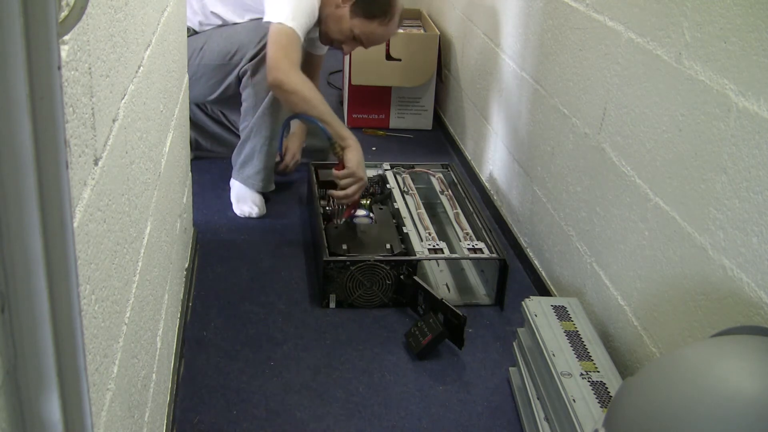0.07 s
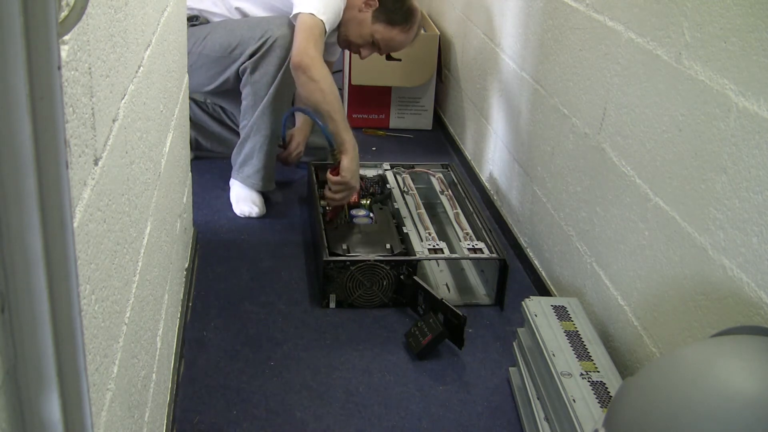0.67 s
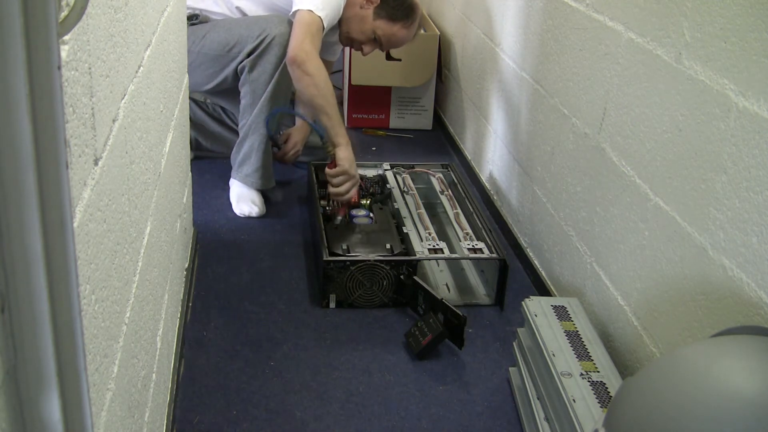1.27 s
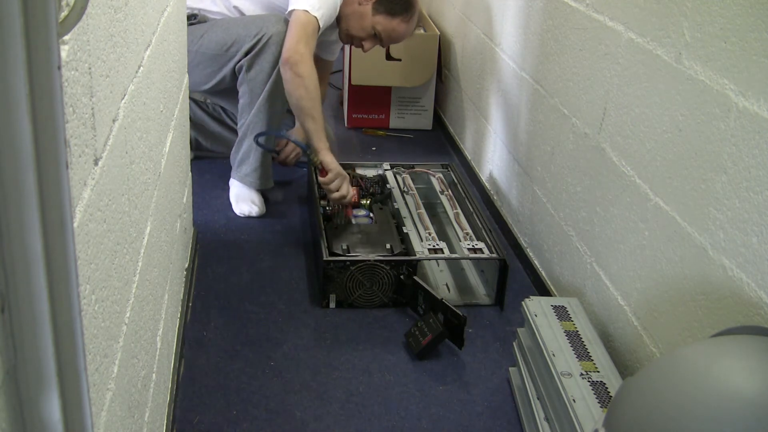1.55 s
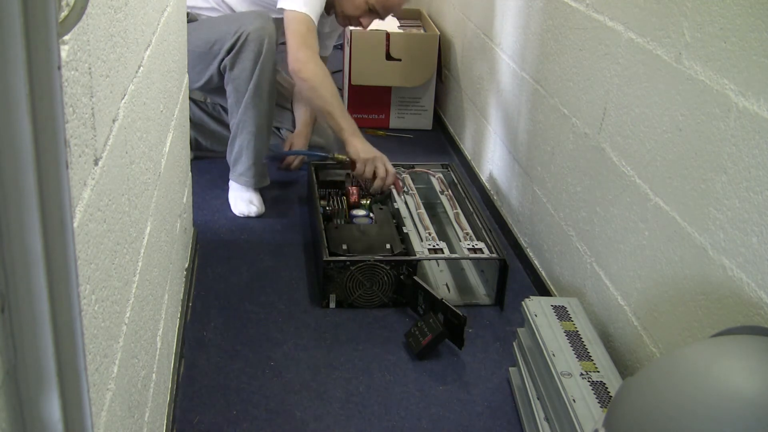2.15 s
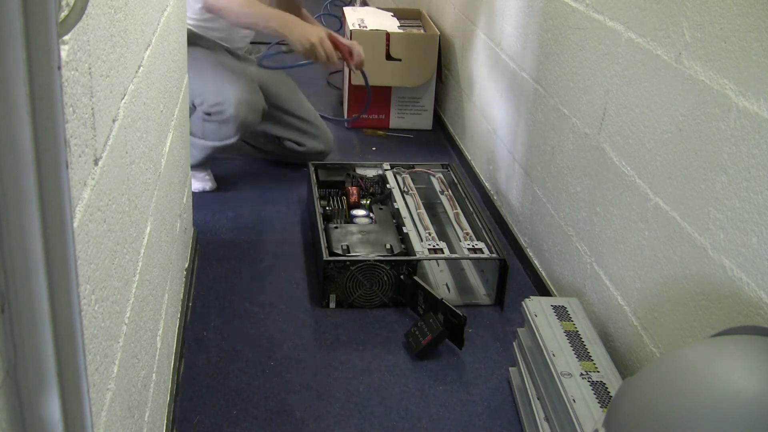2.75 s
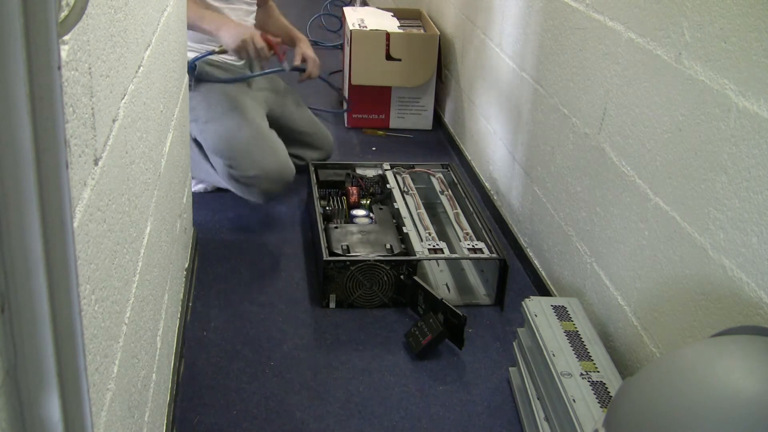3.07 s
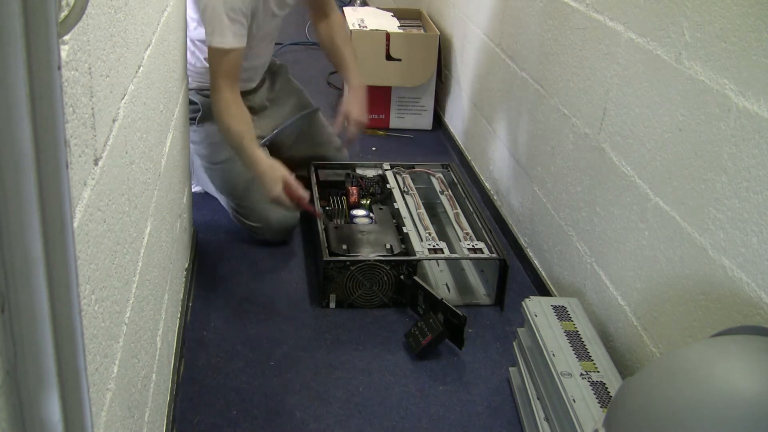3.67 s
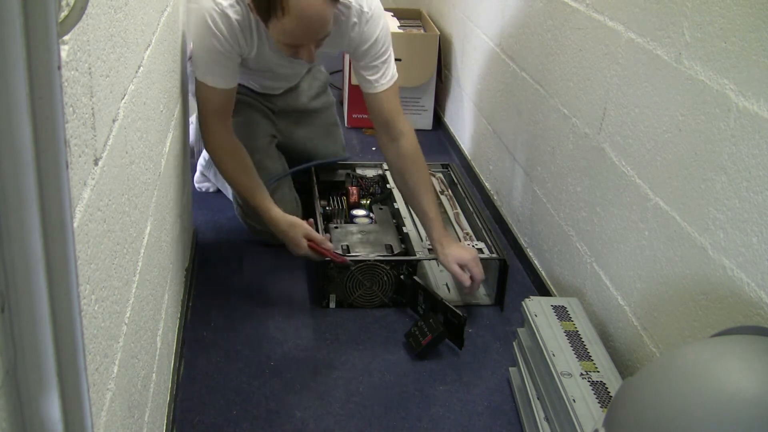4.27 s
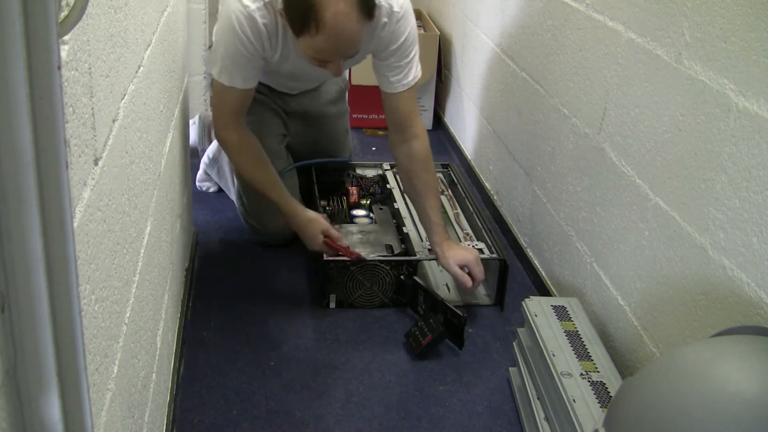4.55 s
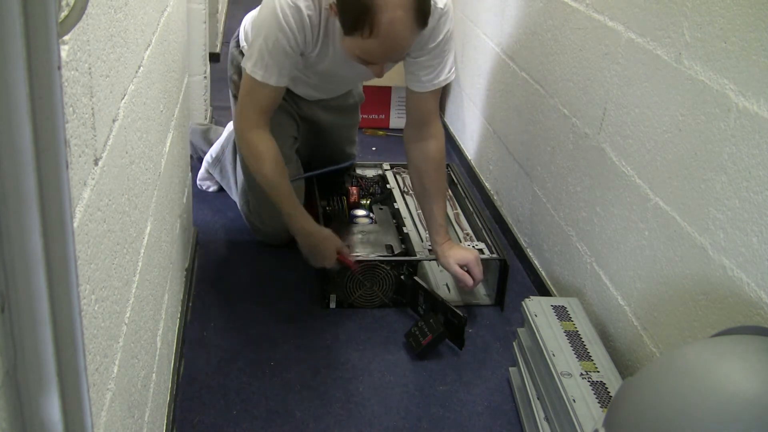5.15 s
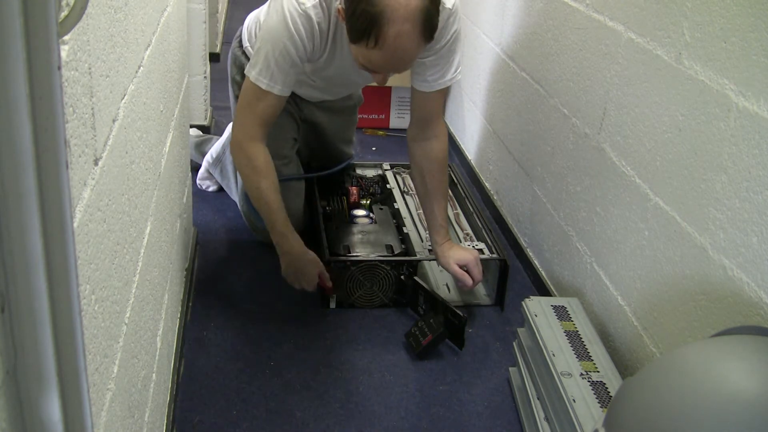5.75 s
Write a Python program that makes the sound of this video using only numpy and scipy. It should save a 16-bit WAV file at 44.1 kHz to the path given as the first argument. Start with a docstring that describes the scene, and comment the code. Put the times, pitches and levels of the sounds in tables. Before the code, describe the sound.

A compressed air gun hisses in three blasts, blowing out a metal computer case, with light knocks and clicks in a pause.

```python
"""A narrow block-walled corridor, where a compressed air gun blows dust from an open computer case.
In three blasts the turbulent jet radiates a broadband hiss; sweeping over the case it tears on edges
and excites the resonances of gaps, cavities and the steel rim. In the long pause the gun clicks and
leaks, and two knocks set the panels into damped vibration. Thuds like distant steps excite the low
modes of floor and corridor, over steady ventilation noise and a weak mains hum."""
import sys
import numpy as np
from scipy import signal
from scipy.fft import rfft, irfft, next_fast_len
from scipy.io import wavfile
from scipy.ndimage import map_coordinates

SR = 44100
rng = np.random.default_rng(int(sys.argv[2]) if len(sys.argv) > 2 else 0)


def wrap_up_sound(samples):
    """Save the sound to the file named by the first command line argument, as 16-bit audio."""
    columns = np.atleast_2d(samples).T
    # keep every value between -1 and 1, then stretch to whole-number steps
    tamed = np.clip(columns, -1, 1)
    steps = np.round(tamed * 32767).astype(np.int16)
    wavfile.write(sys.argv[1], SR, steps)


N = 260631
TIME = np.arange(N) / SR
EVENT_TIME = TIME[:SR // 2]  # t/s within one short event


def amp(db):
    """Amplitude ratio of a level in decibels."""
    return 10 ** (np.asarray(db) / 20)

def along(points, hz):
    """Interpolation of (f/Hz, value) points on a logarithmic frequency axis."""
    f, value = np.transpose(points)
    return np.interp(np.log(hz + 1), np.log(f + 1), value)

def hump(centre_hz, octaves):
    """Gaussian band-pass response on a logarithmic frequency axis."""
    return lambda hz: np.exp(-.5 * (np.log2((hz + 1) / centre_hz) / octaves) ** 2)

def resonance(pitch_hz, half_width_hz):
    """Resonance curve, falling to one half about half_width_hz from its peak."""
    return lambda hz: 1 / (1 + ((hz ** 2 - pitch_hz ** 2) / (2 * half_width_hz * (hz + 1))) ** 2)

def filtered(x, response):
    """Linear filtering: the spectrum is multiplied by a complex frequency response."""
    size = next_fast_len(x.shape[-1] + SR // 4, real=True)
    spectrum = rfft(x, size) * response(np.fft.rfftfreq(size, 1 / SR))
    return irfft(spectrum, size)[..., :x.shape[-1]]

def noise(response, size=N):
    """Two uncorrelated noises, spectrally shaped and normalised to rms 1."""
    pair = filtered(rng.standard_normal((2, size)), response)
    return pair / np.sqrt(np.mean(pair ** 2) + 1e-20)

def wobble(rate):
    """Smooth random modulation: a spline through rate knots a second."""
    return map_coordinates(rng.standard_normal(int(N * rate / SR) + 4), [TIME * rate])

def add(track, start, sound):
    """Superposition of a sound on the track, start seconds in."""
    part = track[..., max(round(start * SR), 0):][..., :sound.shape[-1]]
    part += sound[..., :part.shape[-1]]

def add_noise(track, start, envelope, response):
    """Amplitude modulation: one short event of shaped noise is added to the track."""
    add(track, start, envelope * noise(response, size=len(envelope)))


# Paths to the microphones: ([f/Hz, right minus left/dB], f/Hz above which they tend to antiphase)
FROM_INSIDE_CASE = ([(1000, -0.2), (2400, 2), (4500, 5.5), (8000, 8), (13000, 10)], 9300)
FROM_RIM = ([(1000, 2), (2400, 5.6), (4200, 11.2), (8000, 13), (15000, 12)], 3800)
FROM_AROUND = ([(400, -1), (1000, 1), (4000, 4.5), (8000, 5), (15000, 2.5)], 6600)
# Coherence of the two microphones: f/Hz, coherence (0-1)
COHERENCE = [(300, 1), (1000, 0.94), (2000, 0.86), (4000, 0.44), (8000, 0.7), (14000, 0.6)]

def placed(pair, path, shadow_hz=600):
    """Partial coherence at two microphones; below shadow_hz diffraction evens out their levels."""
    balance, antiphase_hz = path
    def response(hz):
        coherence = along(COHERENCE, hz)
        right = amp(along(balance, hz) * hz ** 2 / (hz ** 2 + shadow_hz ** 2))
        phase_lead = np.pi * (1 - np.exp(-hz / antiphase_hz))
        shared = right * coherence * np.exp(1j * phase_lead)
        own = right * np.sqrt(1 - coherence ** 2)
        mid_gain = np.sqrt(abs(1 + shared) ** 2 + own ** 2) / 2
        return np.array([np.ones_like(hz), shared, own]) / mid_gain
    left, shared, own = filtered(pair[[0, 0, 1]], response)
    return np.array([left, shared + own])


# Ventilation spectrum: f/Hz, relative level/dB
VENT_SPECTRUM = [(15, -25), (25, -11), (102, -6.5), (157, -7), (185, -1), (217, -5), (416, -2), (516, -3),
                 (560, -8.5), (911, -8), (1290, -12.5), (1400, -13), (2350, -20.5), (4490, -24.5),
                 (16000, -34)]
# Its faint hissing bands: f/Hz, half-width/Hz, level/dB
VENT_BANDS = [(4740, 280, -77), (6700, 600, -75)]

def ventilation_and_hum(air_db=-53.5, hum_db=-68.5, hum_hz=100):
    """Stationary background: broadband ventilation noise plus a pure tone of mains hum."""
    air = amp(air_db) * noise(lambda hz: amp(along(VENT_SPECTRUM, hz)))
    air += sum(amp(db) * noise(resonance(hz, width)) for hz, width, db in VENT_BANDS)
    return placed(air, FROM_AROUND) + amp(hum_db) * np.sin(2 * np.pi * hum_hz * TIME)


# Spectra of the free jet and of air on edges, in slots and in the cavity: f/Hz, relative level/dB
JET_SPECTRUM = [(4400, -23), (7500, 6.5), (8300, 6), (10100, 2), (12500, 8), (14500, 7.5), (16000, -3)]
EDGE_SPECTRUM = [(1410, -28.5), (2400, -10.5), (2870, 0.5), (4290, 4.5), (6540, 5), (8200, -10),
                 (10700, -2.5), (18000, -120)]
SLOT_SPECTRUM = [(500, -34), (850, -6.5), (1070, -3.5), (1130, -2.5), (1400, -2), (1590, -5.5), (1740, -4),
                 (2140, -4.5), (2600, -7), (3380, -6.5), (5720, -120)]
CAVITY_SPECTRUM = [(71, -87), (120, -64), (193, -14), (285, -12.5), (322, -20.5), (354, -6.5), (393, -6),
                   (459, 0.5), (518, -2.5), (575, -8.5), (643, -7), (799, -2.5), (950, -9.5), (1240, -15),
                   (2090, -120)]
# Trigger pulls: opening t/s, rise/s, release t/s, base level/dB on edges, in slots and in the cavity,
# nozzle position (0 inside, 1 at the near rim)
TRIGGER_PULLS = [(-.05, .01, 0.11, -26, -33.5, -51, 0), (0.362, 0.024, 2.1376, -32, -36, -42.5, 0),
                 (4.329, .016, 6.0, -31, -38, -40.5, 1)]
# Strength of the free jet, one curve per blast: t/s, level/dB
JET_STRENGTH = [
    [(.04, -27), (.1, -34.5)],
    [(.445, -32), (.565, -35), (.62, -27), (1.2, -27), (1.32, -31), (1.6, -29), (1.8, -29), (1.85, -24.5),
     (2.08, -28), (2.13, -26.5)],
    [(4.45, -25.5), (4.505, -21.5), (4.78, -28), (4.87, -22), (4.97, -27), (5.14, -24), (5.3, -29),
     (5.42, -22.5), (5.48, -29.5), (5.59, -28), (5.65, -23), (5.69, -24), (5.745, -29.5), (5.82, -24.5)],
]
# Its impact on the case as the hand sweeps, one curve per blast: t/s, level/dB
JET_IMPACT = [
    [(.01, -37.5), (.13, -30.5)],
    [(.45, -38.5), (.58, -46), (.66, -38.5), (.95, -38), (1.05, -39.5), (1.23, -38.5), (1.3, -34),
     (1.58, -39.5), (1.74, -31), (1.88, -37), (1.96, -31), (2.09, -29.5)],
    [(4.4, -35), (4.57, -37), (4.81, -30), (4.88, -49), (4.96, -33.5), (5.19, -34.5), (5.27, -45),
     (5.34, -38), (5.46, -47), (5.52, -42), (5.66, -48), (5.8, -40), (5.9, -48.5)],
]
# Sensitivity of edges, slots and cavity: dB/dB of impact, of strength and of pressure loss, flutter/dB
SENSITIVITY = [(.4, 0.48, .7, 1), (.95, 0, .68, .9), (.95, 0, .72, 1.04)]

def air_gun(burst_db=9.5, burst_s=.054, bleed_db_per_s=255, ease_s=.031, shut_s=.244):
    """Turbulent noise follows the supply pressure; air striking the case also follows the impact."""
    out = np.zeros((2, N))
    gusts = flares() + roars() + whistles()
    spectra = JET_SPECTRUM, EDGE_SPECTRUM, SLOT_SPECTRUM, CAVITY_SPECTRUM
    jet, *case_noises = [noise(lambda hz: amp(along(shape, hz))) for shape in spectra]
    flutter = wobble(rate=64)
    base_strength_db, base_impact_db = -25.5, -36
    for pull, strength, impact in zip(TRIGGER_PULLS, JET_STRENGTH, JET_IMPACT):
        opens, rise, release, *levels_db, at_rim = pull
        # The pressure stored in the hose escapes first.
        burst = burst_db * np.exp(-(np.maximum(TIME - opens, 0) / burst_s) ** 2)
        # The trigger is eased off, then the pressure falls steadily.
        released = np.maximum(TIME - release, 0)
        loss_db = bleed_db_per_s * released * (1 - np.exp(-released / ease_s))
        jet_db = np.interp(TIME, *np.transpose(strength)) + burst
        impact_db = np.interp(TIME, *np.transpose(impact)) - base_impact_db
        air = jet * amp(jet_db - 1.23 - loss_db + .5 * flutter) + gusts * amp(-.75 * loss_db)
        for part, db, sensitivity in zip(case_noises, levels_db, SENSITIVITY):
            by_impact, by_strength, by_loss, flutter_db = sensitivity
            drive_db = by_impact * impact_db + by_strength * (jet_db - base_strength_db)
            air += part * amp(db + drive_db - by_loss * loss_db + flutter_db * flutter)
        valve_opening = np.clip((TIME - opens) / rise, 0, 1) ** 2
        valve_closing = np.clip((release + shut_s - TIME) / .02, 0, 1)
        air *= valve_opening * valve_closing
        out += placed(air + rim_ring(air), FROM_RIM) if at_rim else placed(air, FROM_INSIDE_CASE)
    return out

def moving_echoes(x, strength=.14, drift_s=.00013, count=7):
    """Comb filtering by reflections from case and walls, whose paths shift as the hand moves."""
    out = x.copy()
    for delay in rng.uniform(.001009, .013, count):
        emitted = TIME - delay - drift_s * wobble(rate=3)
        out += strength * np.array([np.interp(emitted, TIME, side, left=0) for side in x])
    return out / np.sqrt(1 + count * strength ** 2)

def sweep(length, skew=.7):
    """Envelope of a jet that moves quickly onto an opening and slides off within length seconds."""
    progress = np.minimum(EVENT_TIME / length, 1)
    return np.sqrt(np.abs(np.sin(np.pi * progress ** skew)))


# The jet over narrow gaps: t/s, relative level/dB, f/Hz, half-width/Hz, duration/s
GAP_WHISTLES = [(.06, -33.5, 2040, 130, 0.12), (.005, -28, 4950, 250, .09), (0.602, -37, 5500, 650, 0.48),
                (1.27, -32.5, 1170, 130, 0.39), (1.278, -30.5, 1410, 120, 0.27),
                (1.541, -34, 1250, 200, 0.12), (1.683, -25.5, 1290, 196, .035),
                (1.922, -27.5, 482, 70, .09), (2.008, -28.5, 1600, 250, 0.12), (4.37, -39, 497, 70, .47),
                (4.935, -41, 510, 70, .33), (4.423, -32.5, 2860, 45, .024), (4.422, -31, 6779, 50, 0.026),
                (4.634, -31, 2800, 70, 0.022), (4.72, -30, 6400, 350, 0.031), (4.828, -27, 8000, 330, 0.14),
                (4.945, -28.5, 6460, 400, 0.21), (5.168, -33, 8040, 250, 0.073),
                (5.306, -36, 1290, 130, .1), (5.294, -37.5, 895, 140, .13), (5.765, -34, 1220, 160, .07)]

def whistles():
    """Resonance: a narrow gap selects one band of the turbulence and sounds a rough tone."""
    out = np.zeros((2, N))
    for start, db, pitch_hz, width_hz, length in GAP_WHISTLES:
        add_noise(out, start, amp(db - 2.3) * sweep(length), resonance(pitch_hz, width_hz))
    return out


# Flares on edges and, at 1.47 s, a brief low rumble of the case's panels under the jet:
# t/s, relative level/dB, centre f/Hz, spread/octaves, nominal duration/s
JET_FLARES = [(.012, -26.5, 4300, 0.84, .06), (1.268, -20.5, 3660, 0.87, 0.039),
              (1.36, -26, 3480, 0.47, 0.074), (1.47, -51, 172, .3, .16), (1.626, -19.5, 10000, 1.1, 0.047),
              (1.711, -17.5, 5300, 0.41, 0.02), (1.731, -22.5, 4500, .6, 0.073),
              (1.814, -20.5, 11500, 0.54, 0.03), (2.1, -27, 2900, 0.36, 0.026),
              (4.352, -26.5, 795, 0.33, 0.016), (4.419, -20.5, 2270, 2.1, 0.012),
              (4.641, -18.5, 3640, 1.9, 0.025), (4.733, -21, 4870, 0.98, 0.02),
              (4.825, -17.5, 12500, 0.99, 0.023), (4.862, -21, 6560, 0.62, 0.027),
              (5.125, -21, 4130, 0.99, 0.023), (5.169, -17.5, 4850, 1.1, 0.011),
              (5.206, -23.5, 5500, 1.2, 0.021), (5.332, -26.5, 6170, 0.25, 0.033),
              (5.49, -27, 880, 0.92, 0.011), (5.6, -27.5, 5400, 0.17, 0.077),
              (5.858, -27.5, 5460, 0.21, 0.082)]

def flares():
    """Flow excitation: a noise band swells and decays as the jet crosses an edge or shakes panels."""
    out = np.zeros((2, N))
    for start, db, centre_hz, octaves, length in JET_FLARES:
        age = 2 * EVENT_TIME / length
        swell = age * np.exp(1 - age)
        add_noise(out, start, amp(db - 3) * swell, hump(centre_hz, octaves))
    return out


# The jet over openings: t/s, relative level/dB, duration/s, opening (0 cavity, 1 slots)
OPENING_ROARS = [(.015, -36.5, 0.041, 0), (1.272, -29, .25, 1), (1.492, -34.5, 0.082, 0),
                 (1.682, -30.5, .055, 0), (1.743, -30, 0.025, 0), (1.784, -32, 0.031, 1),
                 (1.912, -32.5, .2, 0), (4.346, -37.5, 0.043, 0), (5.49, -36, .1, 0)]

def roars():
    """Cavity resonance: the hollow case or its slots colour the noise of the passing jet."""
    out = np.zeros((2, N))
    for start, db, length, in_slots in OPENING_ROARS:
        shape = SLOT_SPECTRUM if in_slots else CAVITY_SPECTRUM
        add_noise(out, start, amp(db - 1.5) * sweep(length), lambda hz: amp(along(shape, hz)))
    return out


# Notches in the hiss: centre t/s, half-duration/s, f/Hz, half-width/Hz, depth (0-1)
ECHO_NOTCHES = [(0.65, .26, 4220, 324, .66), (1.047, .084, 4180, 330, .62)]

def bottom_echo(x):
    """Destructive interference: the echo off the case's bottom cancels a band as the nozzle hovers."""
    for centre, half_length, notch_hz, width_hz, depth in ECHO_NOTCHES:
        hovering = np.exp(-((TIME - centre) / half_length) ** 2)
        x = x - depth * hovering * filtered(x, resonance(notch_hz, width_hz))
    return x


# Clicks of the gun and its hose: t/s, level/dB, centre f/Hz, T60/s
GUN_CLICKS = [(2.261, -45, 10850, 0.16), (3.29, -58, 3960, .15), (3.401, -60, 4440, 0.18),
              (4.272, -33.5, 11100, 0.018), (4.281, -48, 9000, 0.14)]

def clicks():
    """Impulsive excitation: each light contact gives a bright noise that decays exponentially."""
    out = np.zeros((2, N))
    for start, db, centre_hz, t60 in GUN_CLICKS:
        add_noise(out, start, amp(db - 60 * EVENT_TIME / t60), hump(centre_hz, octaves=1.07))
    return out


# Reverberation time of the corridor: f/Hz, T60/s
CORRIDOR_DECAY = [(200, 0.31), (2000, 0.32), (12000, 0.15)]

def corridor(x):
    """Reverberation: the wall reflections form a diffuse tail whose treble decays first."""
    hz, t, spectrum = signal.stft(rng.standard_normal((2, SR // 2)), SR, nperseg=256)
    decay = amp(-60 * t / along(CORRIDOR_DECAY, hz)[:, None])
    tail = signal.istft(spectrum * decay, SR, nperseg=256)[1]
    return signal.fftconvolve(x, tail / np.linalg.norm(tail[0]), axes=1)[:, :N]

def leak(start=2.4, end=2.62, breath_db=-52, hiss_db=-57):
    """Weak jet noise: air escapes as the gun is lifted out, brightening as the flow grows."""
    flow = np.clip((TIME - start) / .14, 0, 1) ** .5 * np.clip((end - TIME) / .016, 0, 1)
    breath = amp(breath_db) * noise(hump(1300, octaves=1))
    hiss = amp(hiss_db) * noise(hump(5900, octaves=.72))
    return flow * breath + flow ** 2 * hiss


# Response of the case's panels: f/Hz, relative level/dB
PANEL_SPECTRUM = [(120, -55), (200, -49), (272, -25), (411, -0.5), (513, -4.5), (569, 3), (641, -3),
                  (984, -6), (1050, -10.5), (1270, -2.5), (1510, -9.5), (2400, -16), (6700, -39.5),
                  (9120, -39), (12000, -44), (15600, -72), (22000, -120)]
# Knocks on the case: t/s, level/dB, tilt/(dB per octave), T60/s, contact cut-off f/Hz
CASE_KNOCKS = [(2.569, -24, -5, 0.067, 5000), (2.583, -32, -8, 0.079, 5000), (3.955, -32, 5, 0.084, 4800)]

def knocks(rise_s=.00083):
    """Damped vibration of struck panels; the softness of the contact limits the treble."""
    out = np.zeros((2, N))
    for start, db, tilt, t60, cutoff_hz in CASE_KNOCKS:
        def panel(hz):
            tilt_db = tilt * np.log2(np.maximum(hz, 400) / 1000)
            return amp(along(PANEL_SPECTRUM, hz) + tilt_db) / (1 + (hz / cutoff_hz) ** 2)
        attack = 1 - np.exp(-EVENT_TIME / rise_s)
        add_noise(out, start, attack * amp(db - 60 * EVENT_TIME / t60), panel)
    return out


# Thuds through the floor: t/s, relative level/dB
FOOTFALLS = [(3.31, -37.5), (4.001, -41), (4.645, -43), (5.225, -43), (5.797, -34)]
# Modes of floor and corridor: f/Hz, relative level/dB, T60/s
FLOOR_MODES = [(46.3, -6, 0.56), (61.5, -13, .25), (75.5, -9, 0.28)]

def steps(rise_s=.017, roll_s=.14):
    """Forced, then free vibration: low modes are driven while the foot rolls, then ring out."""
    out, t = np.zeros(N), TIME[:SR]
    attack = np.minimum(t / rise_s, 1)
    ringing_s = np.maximum(t - roll_s, 0)
    for start, db in FOOTFALLS:
        for hz, mode_db, t60 in FLOOR_MODES:
            envelope = attack * amp(db - 2 + mode_db - 60 * ringing_s / t60)
            add(out, start, envelope * np.sin(2 * np.pi * (hz * t + rng.random())))
    return out


# Modes of the steel rim: f/Hz, half-width/Hz, level/dB relative to the hiss
STEEL_RIM_MODES = [(2286, 140, -9.5), (3020, 14, -10.5), (3800, 34, -3), (6960, 210, -6)]

def rim_ring(air):
    """Forced resonance: the rim's modes lift narrow metallic bands out of the hiss."""
    def response(hz):
        return sum(amp(db) * resonance(mode_hz, width)(hz) for mode_hz, width, db in STEEL_RIM_MODES)
    return filtered(air, response)

def scene():
    """Superposition of the blasts, the handling of gun and case, and the building's own sounds."""
    blasts = moving_echoes(bottom_echo(air_gun()))
    contacts = knocks() + clicks()
    handling = placed(contacts + amp(-5) * corridor(contacts) + leak(), FROM_INSIDE_CASE)
    return blasts + handling + steps() + ventilation_and_hum()

def record(dry, cutoff_hz=15950):
    """Band limiting: a steep low-pass filter removes the highest treble."""
    return filtered(dry, lambda hz: 1 / np.sqrt(1 + (hz / cutoff_hz) ** 300))


dry = scene()
out = record(dry)
wrap_up_sound(out)
```